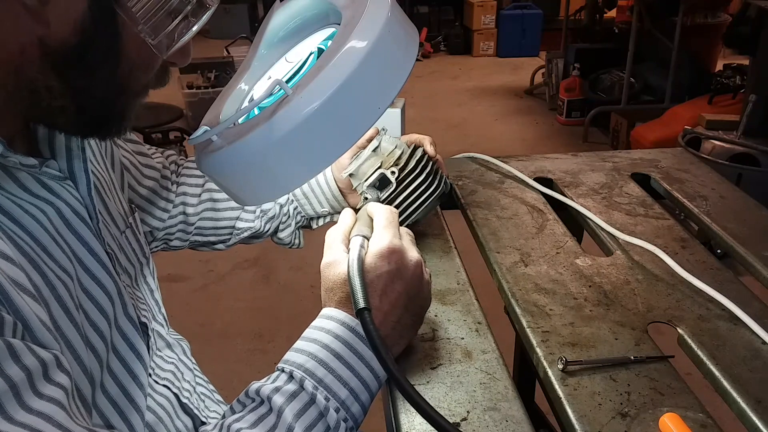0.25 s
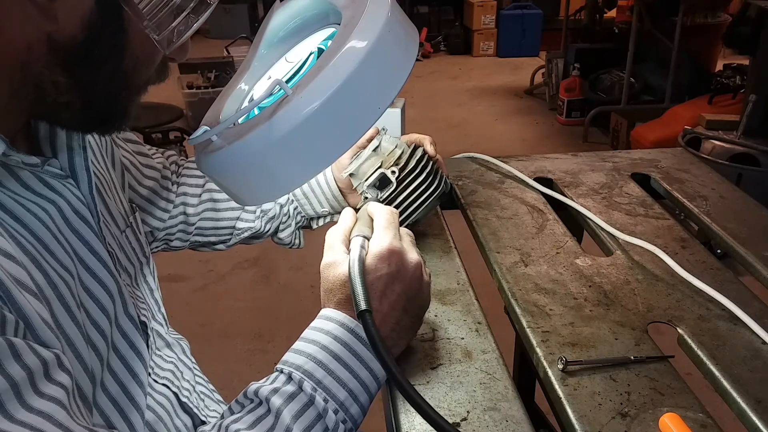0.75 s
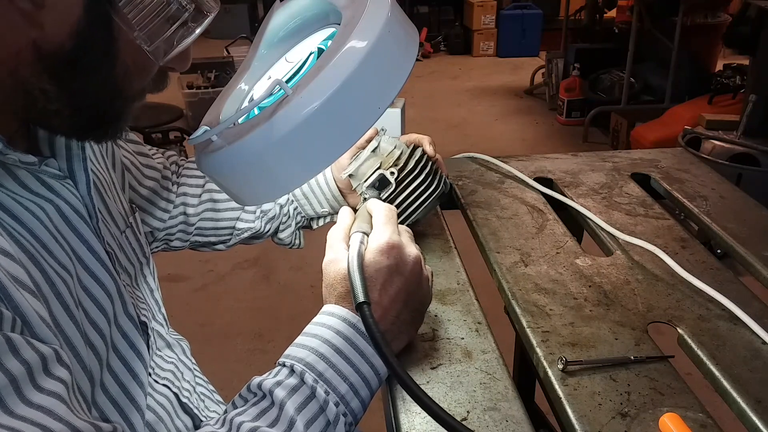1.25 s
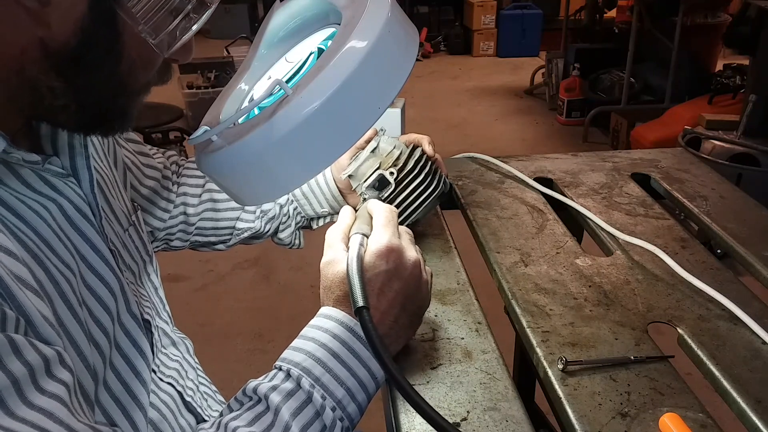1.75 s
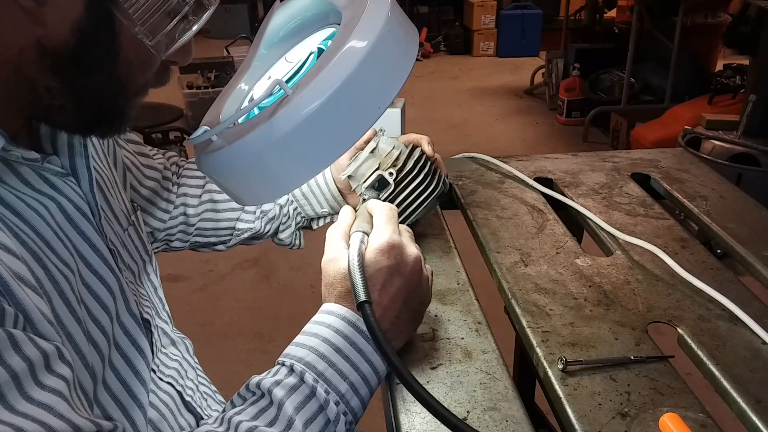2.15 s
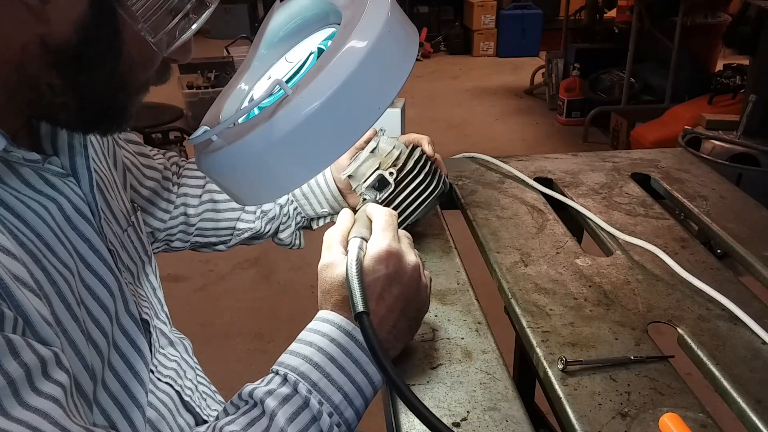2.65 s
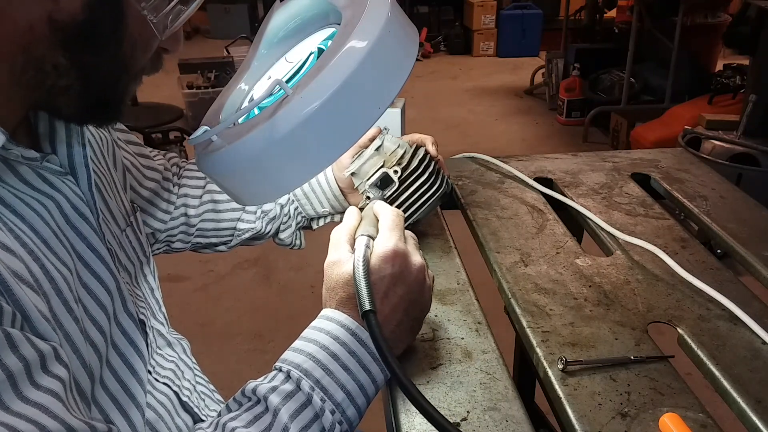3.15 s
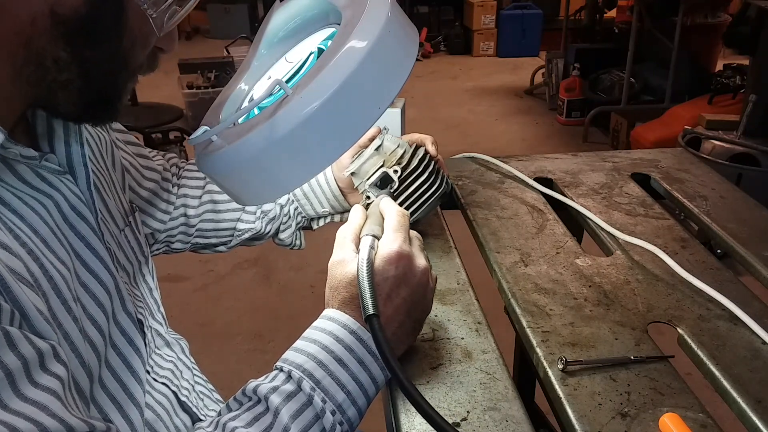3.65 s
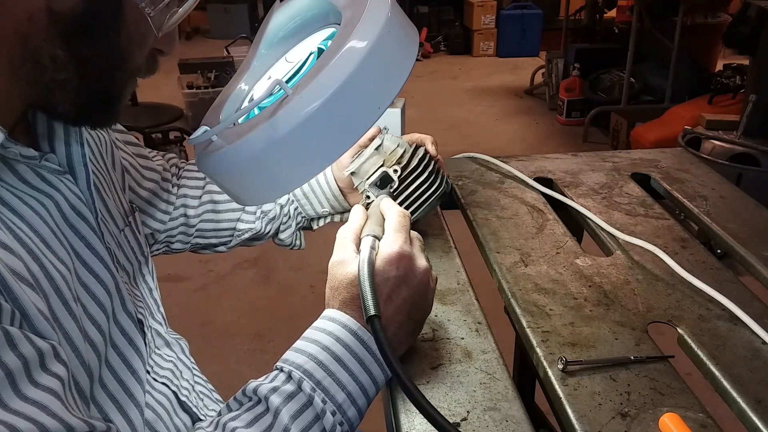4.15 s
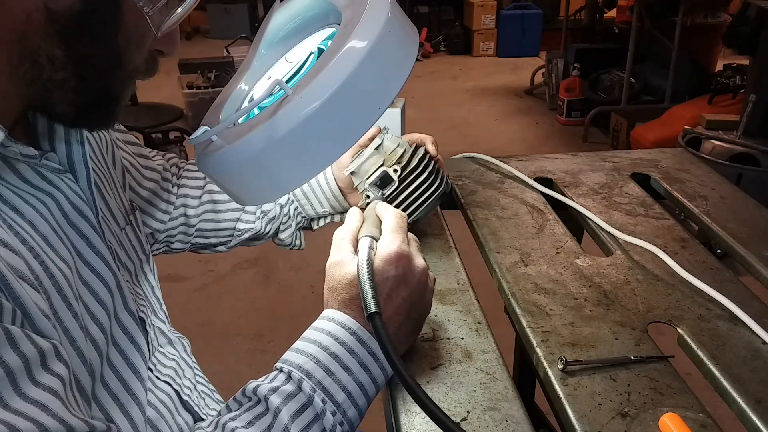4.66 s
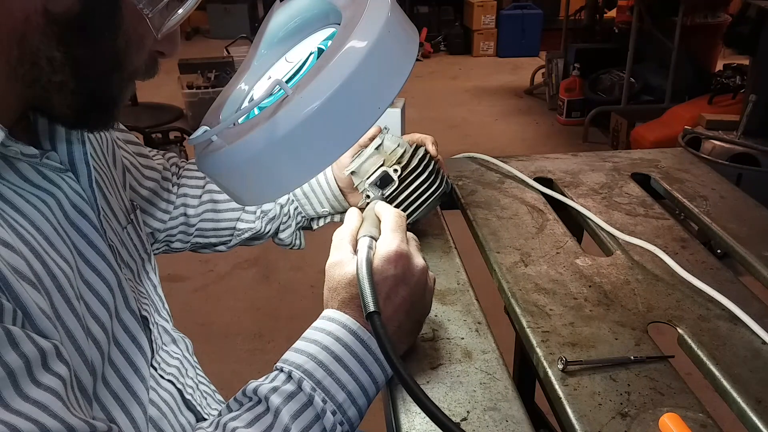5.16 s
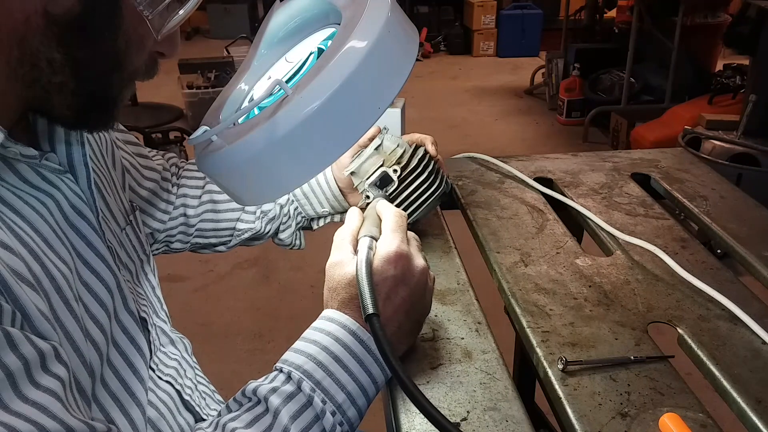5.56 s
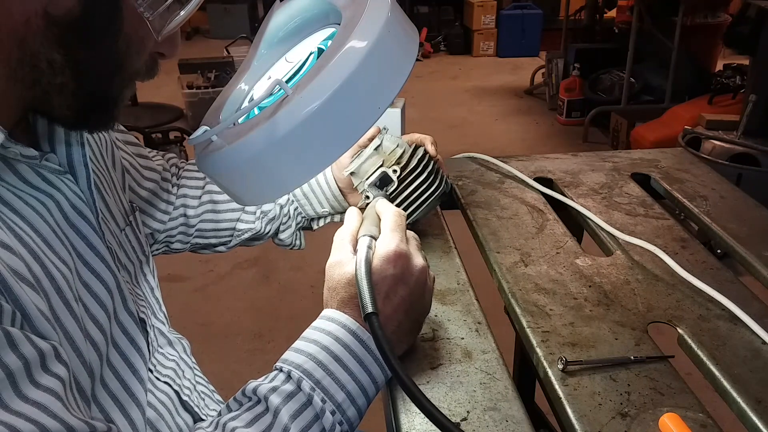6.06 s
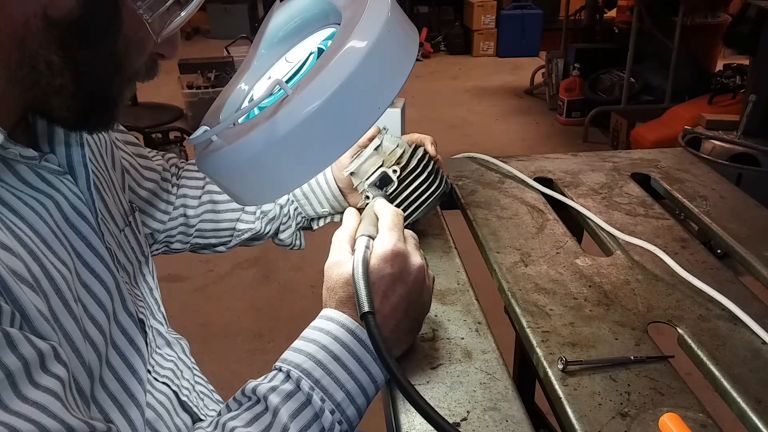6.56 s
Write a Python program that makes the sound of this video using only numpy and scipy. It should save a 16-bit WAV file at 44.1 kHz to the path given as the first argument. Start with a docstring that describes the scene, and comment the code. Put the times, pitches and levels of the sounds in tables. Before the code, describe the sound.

A spinning burr cuts a small finned metal casting on a bench. Two further brief rasping passes follow the opening one, separated by the steady whirr of the freely running motor; the third starts with rattling knocks. Then a sustained grind begins, its pitch slightly lowered under load, easing and digging in while the casting rings and squeals. Close stereo pickup, slightly left, small diffuse workshop reflections.

```python
"""A hard, hollow knocking and a bright rasp open mid-cut: a rotary burr grinds a finned cylinder's port.
The burr knocks on the port wall once a turn and its teeth tear off chips in noisy bursts, over a low drone.
Between four passes the flexible-shaft motor whines freely over fan air and mains hum, and under load it slows.
On the last, long pass the cooling fins sing in tones that flare into squeals, and the barrel rings out."""
import sys
import numpy as np
from scipy import signal
from scipy.fft import rfft, irfft, next_fast_len
from scipy.io import wavfile
from scipy.ndimage import map_coordinates

SR = 44100
rng = np.random.default_rng(int(sys.argv[2]) if len(sys.argv) > 2 else 0)


def dump_mix(stems):
    """Bounce the given channels to the path in sys.argv[1] as a 16-bit WAV at rate SR."""
    frames = np.atleast_2d(stems).T  # one column per channel
    limited = np.clip(frames, -1, 1)  # hard clip at full scale
    pcm = np.round(limited * 32767).astype(np.int16)
    wavfile.write(sys.argv[1], SR, pcm)


N = 299439
TIME = np.arange(N) / SR

# the burr on the wall, levels before pressure and digs: touch_s, lift_s, knock_db, rasp_db, drone_db
PASSES = [(-0.2, 0.484, -38.5, -42.5, -49.5), (0.828, 1.586, -38.5, -44.5, -50),
          (1.94, 2.585, -38, -43.5, -50), (3.21, 6.946, -37, -42, -49.5)]
# lean of the hand, moving on the long pass, first row held before it: time_s, pressure_db, drone_db
PRESSURE = [(3.2, 0.5, 1), (3.38, -1.5, 2.5), (3.56, -4.5, -3), (3.76, -5.5, -14), (3.97, -3, -11.5),
            (4.07, -1.2, -4), (4.16, -1.5, 0.5), (4.7, -0.9, -3), (5.45, 0, 1.5), (6.1, -1, 1.5),
            (6.79, -2.5, 2)]
# the burr digs in for a moment, negative for a dip: middle_s, length_s, knock_change_db, rasp_change_db
DIGS = [(0.025, 0.085, 3.5, 1.5), (0.08, 0.045, 2, 3.5), (0.11, 0.05, 2.5, 0.5), (0.205, 0.092, 2.5, 3.5),
        (0.26, 0.04, -2, -0.5), (0.35, 0.03, -6, 0), (0.44, 0.16, -1, 4.5), (0.97, 0.091, 1, 2),
        (1.07, 0.1, 2, 2.5), (1.39, 0.13, 2, 2.5), (1.45, 0.065, 0.5, 5.5), (1.56, 0.16, -1, 4.5),
        (2.088, 0.05, 1, 5.5), (2.23, 0.15, 3, 3.5), (2.292, 0.066, 5, 5.5), (2.465, 0.091, 1.5, 4),
        (3.33, 0.09, 4, -2), (3.4, 0.06, -3, 0), (3.86, 0.055, 8, 6), (4.075, 0.075, 3.5, 0.5),
        (4.14, 0.14, 6, 2), (4.32, 0.11, 5, 0), (4.37, 0.068, 5.5, -1), (4.415, 0.03, 6, -1),
        (4.505, 0.045, 5.5, 1), (4.607, 0.022, 5, 4.5), (4.675, 0.17, 4, 0.5), (4.82, 0.07, -5, 2.5),
        (4.9, 0.08, 6, 0), (5.04, 0.06, -2.5, 0), (4.995, 0.03, 5.5, 1), (5.17, 0.08, 2, 2),
        (5.235, 0.1, 5.5, 4), (5.355, 0.058, 5, -0.5), (5.395, 0.03, 2.5, -1), (5.5, 0.15, 4.5, 0),
        (5.56, 0.034, 3, 0), (5.61, 0.028, 4, 0), (5.73, 0.04, 2, -2), (5.775, 0.06, -4, -1),
        (5.875, 0.041, -4, -1), (5.835, 0.074, 4.5, 0.5), (5.915, 0.11, 4.5, -1.5), (5.98, 0.042, 5.5, -6),
        (6.11, 0.075, 6.5, -0.5), (6.19, 0.06, 5.5, 2.5), (6.26, 0.13, 2.5, 2), (6.32, 0.072, 5, 0.5),
        (6.395, 0.05, 2, -3.5), (6.45, 0.07, -4, -2), (6.505, 0.07, 4, 2.5), (6.58, 0.069, 3.5, 3.5),
        (6.67, 0.028, 7, -3), (6.765, 0.1, 8, 1)]

# the motor's whine, before its change with load: shaft_order (cycles per turn), level_db
WHINE = [(10, -62), (14, -64), (16, -59.5), (18, -54.5), (20, -71), (22, -68), (24, -71), (32, -68),
         (33, -72), (35, -76), (42, -73), (46, -76), (48, -67), (69, -77), (76, -72)]
# relative colour of the motor's fan and the shop air: pitch_hz, level_db (per Hz)
AIR_COLOUR = [(15, -80), (25, -32.5), (116, -9.5), (152, -16), (391, -13.5), (498, -9), (854, -7.5),
              (1030, -4.5), (1390, -5.5), (2140, -5.5), (2900, -4), (3380, -7.5), (4800, -10),
              (6300, -13.5), (8050, -12.5), (8600, -19), (13000, -12.5), (15700, -15)]
# resonances of the motor housing, which lift the fan noise: pitch_hz, width_hz, lift_db
HOUSING = [(1180, 120, 4), (1530, 50, 3), (1670, 110, 6), (2490, 110, 4), (2710, 90, 1)]
# slow course of the mains hum: time_s, level_db
HUM = [(0, -60.5), (1.3, -57), (3.0, -66.5), (6.79, -76)]
# the drone's octave swells into a buzz: middle_s, length_s, lift_db
BUZZES = [(0.03, 0.26, 5.5), (0.23, 0.13, 5.5), (1.39, 0.56, 8.5), (1.63, 0.23, 16.5), (2.13, 0.11, 12),
          (2.27, 0.091, 6), (2.58, 0.2, 13.5)]

# the burr catches on an edge: start_s, level_db (before the knock gain), crack_db (relative to level_db)
CATCHES = [(0.876, -28, -7), (0.893, -27, -4), (0.9055, -26, -12), (0.9125, -27, -2), (0.952, -24, -12),
           (1.9525, -22, 3), (1.9695, -21, -4), (1.9815, -25.5, -1), (1.993, -25.5, -4), (2.0045, -26, -3),
           (2.0165, -16, -6), (2.028, -19.5, -6), (2.047, -19, -9), (2.058, -17.5, -6), (2.0877, -20, -7),
           (2.289, -19, -11), (2.295, -19, -11), (3.204, -19.5, -10), (3.252, -25, -12),
           (3.2756, -22.5, -14), (3.2805, -22.5, -14), (3.292, -22, -14), (3.364, -20, -14),
           (3.797, -23.5, -14), (3.843, -20, -13), (3.945, -20.5, -14), (4.207, -21, -14),
           (4.712, -21, -14), (5.538, -21, -14), (6.24, -20.5, -14)]
# colour of the port wall under a knock: pitch_hz, level_db
PORT = [(200, -28), (450, -21), (800, -21), (1350, -15.5), (1520, -10), (1620, 0.5), (1690, 1), (1900, 0),
        (2050, -3), (2190, -0.5), (2270, -6.5), (2380, -1), (2520, -4), (2690, -5), (2850, -17),
        (3600, -11), (3950, -15), (5000, -12), (15000, -36.5)]
# steady tones at 10 and 11.5 times the shaft rate, kept up by the knocks on the short passes:
# pitch_hz, width_hz, level_db
KNOCK_TONES = [(1686, 16, -2), (1938, 16, 10)]
# colour of the gritty crack in a catch: pitch_hz, level_db
CRACK = [(1000, -20), (2800, -6), (3500, 6), (4100, -5), (7400, -5), (10000, -16)]
# diffuse answer of bench and walls: pitch_hz, decay_s (to -60 dB)
SHOP = [(200, 0.079), (2000, 0.29), (12000, 0.091)]

# relative colour of chips torn off on the first three passes: pitch_hz, level_db (per Hz)
RASP_FIRST = [(60, -24), (250, -3.5), (900, -21), (1700, 0.5), (2500, 1.5), (3100, 3), (3680, 6),
              (4050, 3.5), (5100, 0.5), (5900, -6), (7400, 1), (9400, -11.5), (13000, -0.5), (15600, -10)]
# relative colour of chips torn off on the last pass: pitch_hz, level_db (per Hz)
RASP_LAST = [(60, -18), (150, -15), (245, -4), (800, -16), (1700, 1.5), (2500, -3), (2950, -7.5),
             (3950, -5.5), (4700, -4), (5100, -1.5), (5400, -10.5), (6300, -11.5), (7200, -6), (8400, -13),
             (9800, -16.5), (11000, -11.5), (13600, -5.5), (14700, -10), (15600, -8)]
# likeness of left and right noise: pitch_hz, likeness (0-1)
ALIKE = [(60, 0.85), (160, 0.71), (300, 1), (700, 0.47), (1300, 0.074), (3300, 0.15), (6000, 0)]
# high casting modes that lift the rasp: pitch_hz, width_hz, short_pass_lift_db, long_pass_lift_db
CASTING = [(5650, 200, 2, 4), (6130, 150, 4, 7), (6490, 130, 3, 8), (6700, 150, 2, 5), (7070, 110, 5, 9),
           (7350, 170, 4, 13), (7800, 170, 0, 6), (8070, 130, 6, 10), (8576, 130, 3, 14),
           (9060, 140, 6, 12), (9230, 100, 1, 7), (9560, 150, 1, 6), (10492, 100, 3, 13),
           (11800, 250, 4, 0), (12317, 90, 0, 8), (12630, 170, 0, 4), (13080, 150, 0, 6), (13361, 80, 0, 8),
           (13600, 200, 4, 5), (13880, 90, 1, 5), (14100, 170, 1, 10), (14357, 70, 1, 12),
           (15050, 160, 3, 11), (15155, 90, 7, 12), (15353, 100, 1, 9)]
# narrow tones in the short-pass rasp, the lower four at whole and half multiples of the shaft rate:
# pitch_hz, width_hz, level_db
RASP_TONES = [(1686, 14, -1), (1770, 25, -5), (1938, 14, 1), (2690, 20, -8), (3600, 40, -14),
              (3690, 50, -12), (4375, 25, -13)]
# modes of the cylinder barrel, rung on the long pass: pitch_hz, width_hz, level_db
BARREL = [(3435, 55, 0), (3600, 35, 1.5), (3709, 25, 0)]
# the barrel rings out as the burr bears on it: middle_s, length_s, lift_db
RINGS = [(3.34, 0.19, 8), (3.78, 0.13, 4), (4.0, .14, 13), (4.09, .1, 7), (4.35, .2, 7.5), (4.51, 0.17, 11),
         (4.69, 0.2, 9), (4.99, 0.087, 8), (5.11, 0.089, 8), (5.22, 0.21, 12), (5.58, .1, 7),
         (5.69, 0.19, 11), (5.82, 0.13, 10.5), (6.0, .09, 8), (6.12, .09, 12), (6.25, .14, 11),
         (6.58, 0.088, 3), (6.76, .14, 9.5)]

# singing tones of the fins, with side tones about one hum or shaft rate away, before the trim:
# pitch_hz, steady_level_db
FIN_TONES = [(3842, -61), (4011, -57), (4151, -56), (4310, -61), (4386, -55.5), (4506, -59.5)]
# one of the singing tones flares into a squeal: middle_s, length_s, pitch_hz, peak_db (before the trim)
SQUEALS = [(3.35, .2, 3842, -49), (3.42, .4, 4011, -45.5), (3.59, .26, 4386, -50), (3.66, .12, 3842, -49),
           (3.77, .12, 3842, -49), (3.79, .42, 4011, -43.5), (3.79, .22, 4386, -49.5),
           (3.9, .18, 4151, -47), (3.91, .14, 4310, -50), (4.02, .24, 4011, -48), (4.05, .24, 3842, -46.5),
           (4.17, .24, 4151, -50), (4.36, .14, 4386, -48), (4.4, .14, 3842, -48), (4.52, .1, 3842, -46),
           (4.56, .2, 4386, -45.5), (4.57, .14, 4151, -46), (4.6, .62, 4011, -46.5), (4.64, .28, 3842, -46),
           (4.69, .26, 4151, -44), (4.75, .14, 4386, -47), (5.08, .26, 3842, -49), (5.08, .28, 4011, -49),
           (5.13, .22, 4151, -41.5), (5.14, .24, 4386, -45), (5.26, .2, 4151, -47),
           (5.37, .22, 4506, -49.5), (5.4, .3, 4011, -50), (5.51, .2, 4151, -49), (5.5, .16, 4386, -49),
           (5.72, .4, 4386, -41.5), (5.85, .2, 3842, -49.5), (5.86, .22, 4506, -50),
           (6.07, .26, 4506, -49.5), (6.14, .18, 3842, -49), (6.14, .5, 4011, -50), (6.16, .26, 4386, -45),
           (6.28, .14, 4386, -46.5), (6.55, .34, 4386, -45.5), (6.73, .16, 3842, -42.5)]

FREE_HZ, LOADED_HZ = 170.15, 168.25  # shaft turns per second, around which the speed wavers
HUM_HZ = 119.8
AIR_DB = -40.26
SPIN_UP_S = 0.049  # the motor's inertia
SKIM_S = 0.0399  # the burr skims the wall this long before it starts to knock
BITE_S, SCRAPE_S, LIFT_S = 0.0999, 0.1, 0.06036  # the knock builds, the rasp builds, the burr comes free
DRONE_BUILD_S, DRONE_EASE_S = 0.28, 0.2  # the bench is slower to get shaking and calms before the lift
DRONE_SWAY_DB = 1.8
BUZZ_DB, BUZZ_SWAY_DB = -8, 2  # the drone's octave under the drone, before its swells, and its waver
RASP_GROWS = 0.8  # rasp dB per dB of pressure; the knock follows one to one
TREMOR_DB, TREMOR_PER_S = 0.5, 16  # the unsteady hand
CHATTER_DB, CHATTER_PER_S = 0.83, 42  # the knock flutters on the long pass
BOUNCE_DB = 1.2  # short-pass strikes alternate this much harder and softer
MISS_FIRM, MISS_PER_DB = 0.1, 0.085  # share of grazing turns at 0 dB pressure, and more per dB eased off
GRAZE_DB = -11  # a graze, against a full strike
KNOCK_TONES_DB = -17  # against the knock
BARREL_DB = -49  # before the ring-outs
TOP_HZ = 15770  # upper band limit of the whole sound


def amp(db):
    """Decibels to gain."""
    return 10 ** (np.asarray(db) / 20)


def unit(x):
    """Scaled to rms 1."""
    return x / np.sqrt(np.mean(x ** 2) + 1e-20)


def along(points, hz):
    """Reads (Hz, value) points on a log frequency axis."""
    f, v = np.transpose(points)
    return np.interp(np.log(hz + 1), np.log(f + 1), v)


def curves(rows):
    """One value per sample for each column after the time."""
    s, *cols = np.transpose(rows)
    return [np.interp(TIME, s, col) for col in cols]


def wobble(rate):
    """A smooth random curve, rate knots a second."""
    knots = rng.standard_normal(int(N * rate / SR) + 4)
    return map_coordinates(knots, [TIME * rate])


def swells(rows):
    """A smooth hump for each (middle s, length s, height, ..) row; one curve per height column."""
    middle, length, *heights = np.transpose(rows)
    phase = np.clip((TIME - middle[:, None]) / length[:, None], -.5, .5)
    return np.array(heights) @ np.cos(np.pi * phase) ** 2


def filtered(x, response):
    """x shaped by a complex response of frequency, padded so the ring does not wrap round."""
    size = 2 * next_fast_len(N // 2 + SR // 4)
    hz = np.fft.rfftfreq(size, 1 / SR)
    return irfft(rfft(x, size) * response(hz), size)[..., :N]


def lifted(points, modes, hz):
    """A broad (Hz, dB) colour with a bell for each (Hz, width Hz, lift dB) resonance, as a gain."""
    bells = sum(db * np.exp2(-np.minimum((2 * (hz - c) / w) ** 2, 20)) for c, w, db in modes)
    return amp(along(points, hz) + bells)


def metal(points, hz, modes=()):
    """Causal, minimum-phase response of the small casting, which radiates no deep bass."""
    gain = lifted(points, modes, hz) / (1 + (190 / (hz + 1)) ** 4)
    cepstrum = irfft(np.log(gain + 1e-6))
    half = len(cepstrum) // 2
    # folding the cepstrum forward in time makes the response causal
    cepstrum[1:half] *= 2
    cepstrum[half + 1:] = 0
    return np.exp(rfft(cepstrum))


def resonant(x, bands):
    """x through narrow (Hz, width Hz, dB) resonant band-passes, at rms 1."""
    def ring(hz):
        return sum(amp(db) * 1j * hz * w / (c * c - hz * hz + 1j * hz * w) for c, w, db in bands)
    return unit(filtered(x, ring))


def noise_pair():
    """White stereo noise, alike in the bass and unrelated in the treble."""
    def mid_side(hz):
        turn = np.arccos(np.clip(along(ALIKE, hz), -1, 1)) / 2
        return np.array([np.cos(turn), np.sin(turn)])
    mid, side = filtered(rng.standard_normal((2, N)), mid_side)
    return np.array([mid + side, mid - side])


def pulses(times, sizes):
    """Band-limited clicks placed between samples."""
    at = np.asarray(times)[:, None] * SR
    taps = np.floor(at).astype(int) + np.arange(-7, 9)
    shape = np.sinc(taps - at) * np.sinc((taps - at) / 8)  # windowed sinc
    return np.bincount(np.clip(taps, 0, N).ravel(), (sizes[:, None] * shape).ravel(), N + 1)[:N]


def dying(x, seconds):
    """Every click of x becomes an exponential decay."""
    return signal.lfilter([1], [1, -np.exp(-1 / (seconds * SR))], x)


def lingering(level, ring_s, tail_db):
    """A level curve that leaves a weaker, dying tail when it drops."""
    return np.maximum(level, amp(tail_db) * dying(level, ring_s) / (ring_s * SR))


def leftward(x, db):
    """Louder by db in the left ear than in the right."""
    return x * amp([[db / 2], [-db / 2]])


def partial(cycles, sway_db, drift, rate):
    """A stereo line of rms about 1 that wavers in level and phase, differently at each ear."""
    level = np.array([wobble(rate), wobble(rate)])
    phase = np.array([wobble(rate), wobble(rate)])
    return np.sqrt(2) * amp(sway_db * level) * np.sin(2 * np.pi * cycles + drift * phase)


def contact(touch, lift, rise_s, fall_s):
    """Rises as the burr sinks in, holds, and is gone once it has come free (0-1)."""
    rise = np.clip((TIME - touch) / rise_s, 0, 1)
    fall = np.clip((lift + LIFT_S - TIME) / fall_s, 0, 1)
    return rise * fall


def long_pass():
    """Contact with the wall on the last pass alone (0-1)."""
    touch, lift = PASSES[-1][:2]
    return contact(touch + SKIM_S, lift, BITE_S, LIFT_S)


def passes(last):
    """Load (0-1) and the gains of knock, rasp and drone: wall contact times the pressure of the hand."""
    knock = scrape = shake = 0
    for touch, lift, knock_db, rasp_db, drone_db in PASSES:
        knock = knock + amp(knock_db) * contact(touch + SKIM_S, lift, BITE_S, LIFT_S)
        scrape = scrape + amp(rasp_db) * contact(touch, lift, SCRAPE_S, LIFT_S)
        shake = shake + amp(drone_db) * contact(touch, lift, DRONE_BUILD_S, DRONE_EASE_S)
    lean_db, lean_drone_db = curves(PRESSURE)
    pressure_db = lean_db + TREMOR_DB * wobble(TREMOR_PER_S)
    dig_knock_db, dig_rasp_db = swells(DIGS)
    chatter_db = last * CHATTER_DB * wobble(CHATTER_PER_S)
    knock = knock * amp(pressure_db + dig_knock_db + chatter_db)
    scrape = lingering(scrape, ring_s=0.053, tail_db=-3) * amp(RASP_GROWS * pressure_db + dig_rasp_db)
    shake = shake * amp(lean_drone_db + DRONE_SWAY_DB * wobble(TREMOR_PER_S))
    # a knock gain of -41 dB or more loads the motor fully
    freedom = 1 - np.clip(knock / amp(-41), 0, 1) ** 2
    load = 1 - dying(freedom, SPIN_UP_S) / (SPIN_UP_S * SR)
    return load, knock, scrape, shake


def shaft(load):
    """Turns made: the motor slows a little, and wavers more, as the burr bites."""
    waver_hz = (0.0712 + 0.1839 * load) * wobble(9)
    speed_hz = FREE_HZ + (LOADED_HZ - FREE_HZ) * load + waver_hz
    return np.cumsum(speed_hz) / SR


def strikes(turns, last, jitter_s, stray_s, scatter_db):
    """One uneven strike a turn: a lightly held burr grazes more, and on short passes it bounces."""
    number = np.arange(1, int(turns[-1]))
    times = np.interp(number, turns, TIME)
    late, stray, strength = rng.standard_normal((len(times), 3)).T
    bounce_db = BOUNCE_DB * (-1) ** number * (1 - np.interp(times, TIME, last))
    pressure_db = np.interp(times, TIME, curves(PRESSURE)[0])
    miss = np.clip(MISS_FIRM - MISS_PER_DB * pressure_db, 0, .8)
    graze_db = GRAZE_DB * (rng.random(len(times)) < miss)
    scattered_db = scatter_db * np.minimum(strength, .7)
    # the division makes up for the energy lost to grazes
    sizes = amp(scattered_db + bounce_db + graze_db) / np.sqrt(1 - miss)
    # only the larger strays are kept
    return times + jitter_s * late + stray_s * stray * (abs(stray) > 1), sizes


def motor(turns, load):
    """Fan air, the whine of armature and blades that weakens under load, and mains hum."""
    lines = 0
    for order, db in WHINE:
        lines = lines + amp(db) * partial(order * turns, sway_db=.8, drift=.15, rate=10)
    whine = amp(2.8 - 7.5 * load) * lines
    air = unit(filtered(noise_pair(), lambda hz: lifted(AIR_COLOUR, HOUSING, hz)))
    hum = amp(curves(HUM)[0]) * np.sqrt(2) * np.sin(2 * np.pi * HUM_HZ * TIME)
    return leftward(amp(AIR_DB + 0.91 * wobble(18)) * air + whine + hum, db=1.0)


def drone(turns, shake, ring_s):
    """The burr's once-a-turn push shakes cylinder and bench, which hum on briefly after it lifts."""
    angle = 2 * np.pi * turns
    level = lingering(shake, ring_s, tail_db=-2.5)
    first = level * np.sin(angle)
    buzz_db = BUZZ_DB + swells(BUZZES)[0] + BUZZ_SWAY_DB * wobble(18)
    octave = level * amp(buzz_db) * np.sin(2 * angle)
    return np.sqrt(2) * (leftward(first, db=2.5) + leftward(octave, db=0.5))


def shop(x, count=12):
    """Bench and walls answer diffusely; the pattern shifts as hands and work move."""
    hz, t, z = signal.stft(rng.standard_normal((count, 2, SR // 4)), SR, nperseg=256)
    decay = amp(-60 * t / along(SHOP, hz)[:, None])
    tails = signal.istft(z * decay, SR, nperseg=256)[1]
    tails /= np.linalg.norm(tails, axis=-1, keepdims=True)
    place = np.linspace(0, count - 1, N)
    answer = 0
    for k, tail in enumerate(tails):
        share = np.sqrt(np.clip(1 - abs(place - k), 0, 1))  # crossfade from tail to tail
        answer = answer + signal.oaconvolve((x * share)[None], tail, axes=1)[:, :N]
    return answer


def knocks(times, sizes, knock, last):
    """Each strike gives a short, hollow knock in the port; a catch adds a hard one with a gritty crack."""
    blows = pulses(times, sizes)
    hollow = unit(filtered(blows, lambda hz: metal(PORT, hz)))
    tones = amp(KNOCK_TONES_DB) * (1 - last) * resonant(blows, KNOCK_TONES)
    run = knock * (hollow + tones)
    s, db, crack_db = np.transpose(CATCHES)
    hard_knock = amp(21.5) * filtered(pulses(s, amp(db)), lambda hz: metal(PORT, hz))
    grit = dying(pulses(s, amp(db + crack_db)), seconds=.002) * rng.standard_normal(N)
    crack = filtered(grit, lambda hz: metal(CRACK, hz))
    dry_knocks = run + hard_knock + crack
    # the left ear is a little nearer: 65 microseconds ahead of the right
    ears = np.array([[1], [-1]])
    direct = filtered(dry_knocks, lambda hz: np.exp(1j * np.pi * hz * 6.5e-5 * ears))
    return leftward(direct + amp(-9) * shop(dry_knocks), db=2.7)


def rasp(times, sizes, scrape, last, burst_s, steady, gritty_db):
    """Teeth tear chips in a burst per strike and scrape on between, ringing casting and barrel."""
    bites = sizes * amp(3.5 * np.minimum(rng.standard_normal(len(sizes)), 1))
    bursts = unit(dying(pulses(times, bites), burst_s))
    grit = amp(gritty_db * wobble(1800) + 1.02 * wobble(35))
    chips = unit((bursts + steady) * grit * noise_pair())
    first_modes = [(hz, width, db) for hz, width, db, _ in CASTING]
    last_modes = [(hz, width, db) for hz, width, _, db in CASTING]
    first_cut = amp(6.5) * unit(filtered(chips, lambda hz: metal(RASP_FIRST, hz, first_modes)))
    first_cut = first_cut + amp(3.0) * resonant(chips, RASP_TONES)
    last_cut = amp(8.5) * unit(filtered(chips, lambda hz: metal(RASP_LAST, hz, last_modes)))
    barrel = amp(BARREL_DB + swells(RINGS)[0]) * long_pass() * resonant(chips, BARREL)
    return leftward(scrape * ((1 - last) * first_cut + last * last_cut), db=1.2) + barrel


def fins():
    """On the last pass the fins sing with side tones; the squeal hops from tone to tone as the burr slides."""
    singing = 0
    for hz, steady_db in FIN_TONES:
        steady = amp(steady_db)
        flares = [(s, length, amp(db) - steady) for s, length, pitch, db in SQUEALS if pitch == hz]
        tone = partial(hz * TIME, sway_db=1.3, drift=.45, rate=16)
        singing = singing + (steady + swells(flares)[0]) * tone
    return leftward(amp(0.3) * long_pass() * singing, db=-1.0)


def scene():
    """One shaft paces whine, drone, knocks and rasp; the fins' singing tones and side tones join them."""
    # 0 on the short passes, 1 on the last one
    last = curves([(3.0, 0), (3.2, 1)])[0]
    load, knock, scrape, shake = passes(last)
    turns = shaft(load)
    times, sizes = strikes(turns, last, jitter_s=2.8e-5, stray_s=8e-5, scatter_db=0.5)
    running = motor(turns, load) + drone(turns, shake, ring_s=0.087)
    knocking = knocks(times, sizes, knock, last)
    rasping = rasp(times, sizes, scrape, last, burst_s=0.0018, steady=3.0, gritty_db=2.5)
    return running + knocking + rasping + fins()


def record(dry):
    """Keeps nothing at or above the band limit."""
    return filtered(dry, lambda hz: hz < TOP_HZ)


dry = scene()
out = record(dry)
dump_mix(out)
```